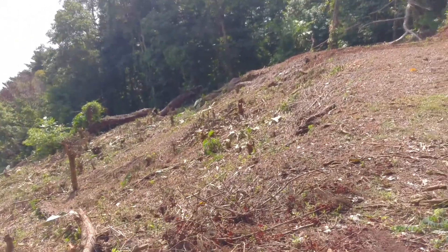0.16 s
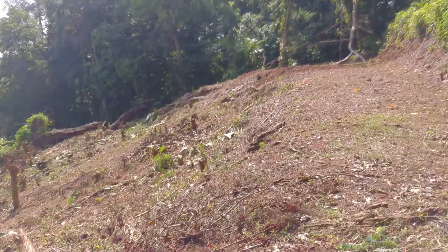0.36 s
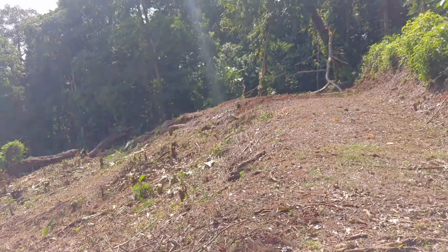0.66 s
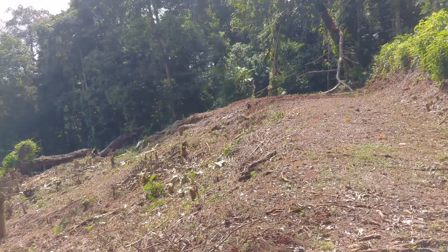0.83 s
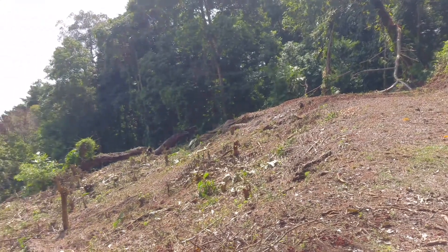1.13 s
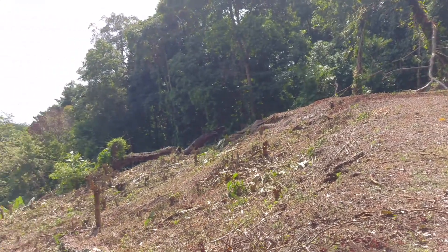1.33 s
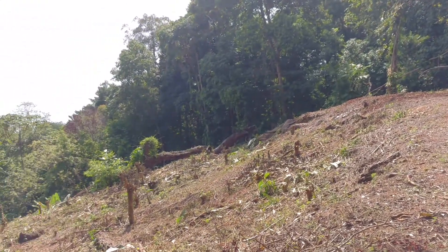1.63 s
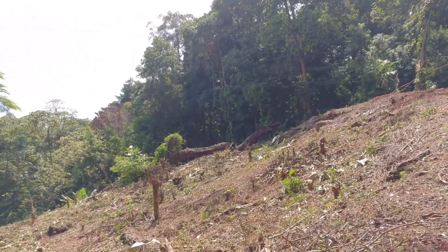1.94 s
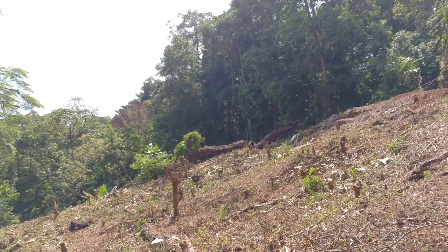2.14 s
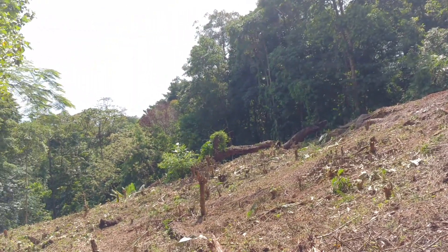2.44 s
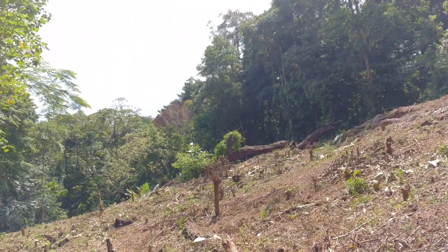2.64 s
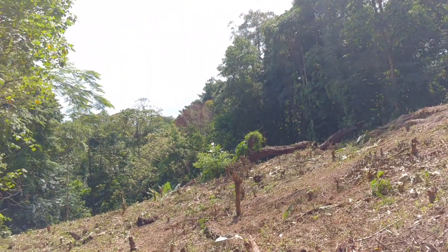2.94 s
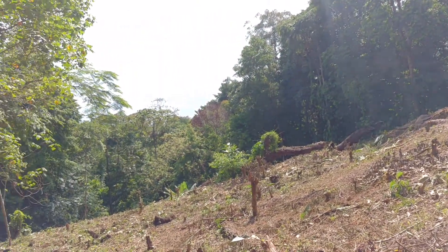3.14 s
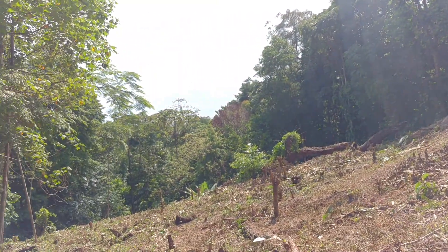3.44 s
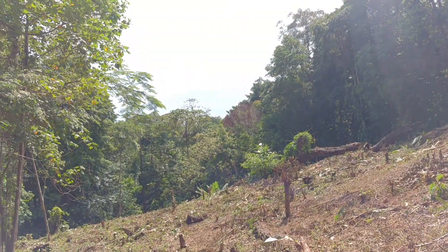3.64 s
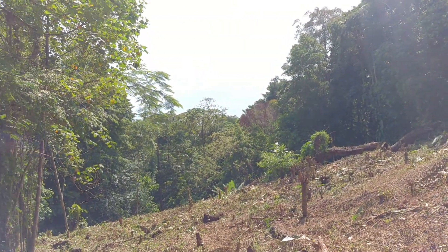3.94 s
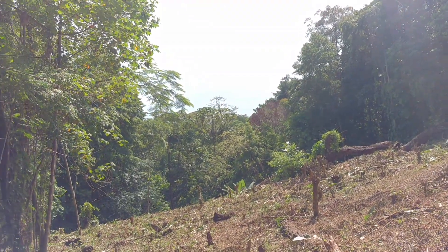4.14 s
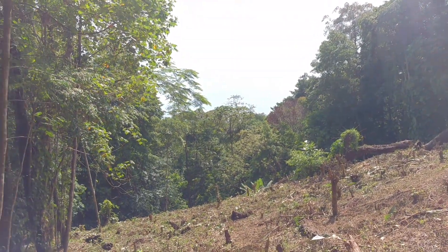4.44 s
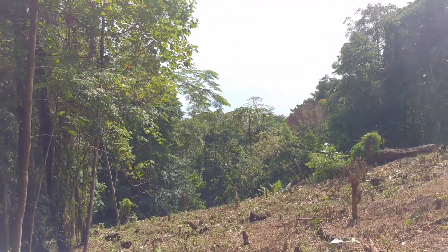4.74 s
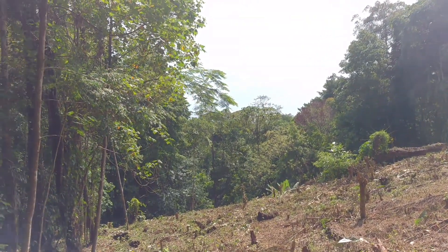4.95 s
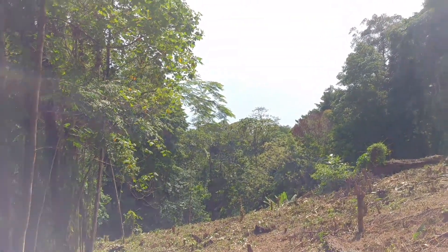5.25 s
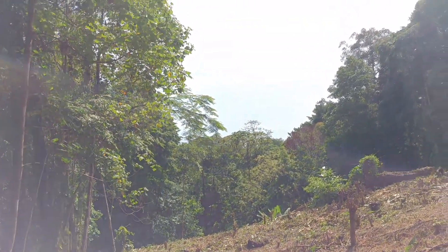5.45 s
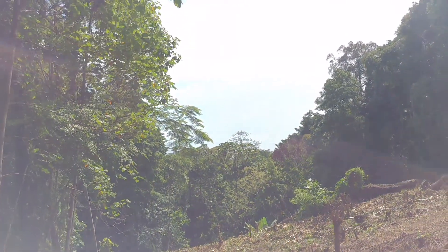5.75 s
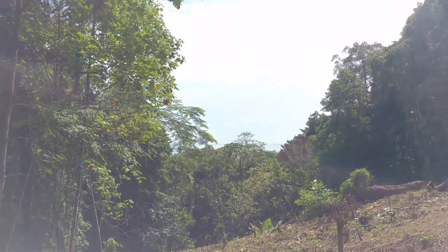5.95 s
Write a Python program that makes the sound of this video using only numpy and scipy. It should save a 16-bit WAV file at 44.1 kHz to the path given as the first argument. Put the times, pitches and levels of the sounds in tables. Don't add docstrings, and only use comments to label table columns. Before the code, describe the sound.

Two layers of cicadas hold an almost continuous shrill shimmer, fullest in the middle and softer toward the end. Distant birds give short buzzing chirps, rising whistles and a faint hoarse coo, with a light forest echo. Broad airy hiss and slight air rumble fill the background. Close to the handheld phone, fingertip taps and ticks occur, followed late by crackly dry-leaf strokes.

```python
import sys
import numpy as np
from scipy import signal
from scipy.fft import rfft, irfft, next_fast_len
from scipy.io import wavfile
from scipy.ndimage import uniform_filter1d

SR = 44100
rng = np.random.default_rng(int(sys.argv[2]) if len(sys.argv) > 2 else 0)


def materialize(psi):
    bounded = np.clip(np.atleast_2d(psi).T, -1, 1)
    quanta = np.round(bounded * 32767).astype(np.int16)
    wavfile.write(sys.argv[1], SR, quanta)


def convert_level_to_amplitude(level_db):
    exponent = np.asarray(level_db, float) / 20
    return 10 ** exponent


N = 268436

SIZE = next_fast_len(N)
HZ = np.arange(SIZE // 2 + 1) * SR / SIZE + 1e-3
TIME = np.arange(N) / SR
PORT_GAP_S = 0.0003813


def shape(points, count=1):
    points = np.array(points)
    return np.interp(np.log(HZ), np.log(points[:, 0]), points[:, count])


def back(spectrum):
    return irfft(spectrum, SIZE)[..., :N]


def lag(seconds):
    return np.exp(-2j * np.pi * HZ * seconds)


def sides(left_db):
    return convert_level_to_amplitude(np.array([[left_db], [-left_db]]) / 2)


def unit(x):
    return x / np.sqrt(np.mean(x ** 2))


def noise(channels):
    return rfft(rng.standard_normal((channels, SIZE))) * np.sqrt(SR / 2)


def walk(rate):
    k = int(SR / rate)
    steps = np.repeat(rng.standard_normal(N // k + 1), k)
    smooth = uniform_filter1d(uniform_filter1d(steps, k), k)
    return unit(smooth[:N])


def cicadas(level_db, kind, count):
    low_hz, high_hz, width, rate, throb, throb_db, gain_db, left_db = kind
    out = 0
    for hz in np.linspace(low_hz, high_hz, count):
        pace, place, start = rng.uniform(-1, 1, size=3)
        chance = rng.standard_normal((4000, 2))
        at = np.cumsum((1 + .12 * chance[:, 0]) / (rate * (1 + .2 * pace)))
        swing = throb_db * np.sin(2 * np.pi * throb * (1 + 0.202 * pace) * at + np.pi * start)
        strength = convert_level_to_amplitude(swing + 3.0 * chance[:, 1])
        clicks = np.bincount((at * SR).astype(int), strength, SIZE)[:SIZE]
        body = 1 / (1 + 1j * (HZ / hz - hz / HZ) * hz / width) ** 2
        out = out + rfft(clicks) * body * np.array([1 + 0 * HZ, lag(place * PORT_GAP_S)])
    return unit(back(out)) * convert_level_to_amplitude(level_db + gain_db) * sides(left_db)


def chorus():
    # (t/s, high level/dB, low level/dB)
    swells = [
        (0, -48, -54),
        (.28, -45.5, -54.5),
        (.75, -45, -52.5),
        (1.75, -44.5, -52.5),
        (2.6, -44.5, -52.5),
        (3.5, -44.5, -53.5),
        (4.4, -46, -53),
        (5.2, -47, -52.5),
        (6.09, -49.5, -52.5),
    ]
    # (lowest body f/Hz, highest body f/Hz, width/Hz, clicks per s, throbs per s,
    # throb/dB, gain/dB, left minus right/dB)
    high_kind = (8325, 10326, 550, 310, 12, 0.27, 4.43, 2.4)
    core_kind = (8887, 8981, 319, 280, 36, 3, -8.5, -7)
    low_kind = (6950, 7290, 400, 240, 11, 2.2, 2.56, 10)
    s, high_db, low_db = np.transpose(swells)
    drone = cicadas(np.interp(TIME, s, high_db), high_kind, count=16)
    drone += cicadas(np.interp(TIME, s, high_db), core_kind, count=4)
    drone += cicadas(np.interp(TIME, s, low_db), low_kind, count=7)
    return drone


def bird_notes():
    # (t/s, f/Hz, level/dB)
    buzzes = [(.303, 4060, -59), (.385, 5100, -49.5), (.51, 4900, -50), (.58, 3920, -58),
              (.72, 4870, -49.5), (1.371, 5130, -50.5), (1.70, 5160, -52), (1.953, 4770, -51),
              (2.37, 4940, -48), (2.47, 3810, -62), (3.031, 4960, -47.5), (3.388, 5050, -54),
              (3.475, 3950, -53), (3.6, 3840, -56.5), (3.875, 4830, -50), (4.296, 5270, -55),
              (4.663, 4870, -51), (4.802, 5030, -53), (5.281, 4850, -48), (5.889, 4770, -46.5),
              (5.96, 3800, -50.5)]
    # (t/s, length/s, from f/Hz, to f/Hz, level/dB)
    whistles = [
        (1.145, 0.015, 3500, 3540, -57),
        (2.176, 0.07, 3330, 4030, -54.5),
        (2.24, 0.044, 4300, 5300, -48),
        (2.272, .027, 5800, 5900, -52),
        (2.426, 0.036, 4700, 3320, -49),
        (2.464, .03, 3400, 4400, -49),
        (2.485, .029, 4400, 3270, -51),
        (5.7, .046, 3700, 4140, -64),
    ]
    riser_db = (-66, -60, -61, -59, -61)
    # (t/s, length/s, level/dB)
    coos = [
        (0, 0.051, -52),
        (3.615, 0.39, -59),
        (5.664, 0.197, -57),
    ]
    waver_hz, near_db = 35, 4.5
    out = [(s, 0.0996, hz - 40, hz + 40, db, 260, 0) for s, hz, db in buzzes]
    out += [tuple(row) + (waver_hz, near_db) for row in whistles]
    for k, db in enumerate(riser_db):
        out.append((.94 + k * .282, .1, 2320, 2750, db, waver_hz, near_db))
    out += [(s, length, 1023, 1023 + 101.6, db, 99.6, 0) for s, length, db in coos]
    return out


def birds():
    canopy_lag, valley_lag = 3, 9
    t60_s, echo_db = 0.67, 3.5
    voice, direct, shake = np.zeros(N), np.zeros((2, N)), walk(260)
    for s, length, from_hz, to_hz, db, buzz_hz, near_db in bird_notes():
        i = np.arange(int(s * SR), min(int((s + length) * SR), N))
        u = (TIME[i] - s) / length
        pitch = from_hz + (to_hz - from_hz) * u + buzz_hz * shake[i]
        swell = np.abs(np.sin(np.pi * u)) ** 0.13
        note = convert_level_to_amplitude(db) * swell * np.sin(2 * np.pi * np.cumsum(pitch) / SR)
        voice[i] += note
        late = valley_lag if to_hz < 3000 else canopy_lag
        direct[0, i] += note * convert_level_to_amplitude(near_db)
        direct[1, np.minimum(i + late, N - 1)] += note * convert_level_to_amplitude(near_db)
    echo = rng.standard_normal((2, SR)) * np.exp(-np.log(1000) * TIME[:SR] / t60_s)
    echo *= convert_level_to_amplitude(echo_db) / np.sqrt(np.sum(echo ** 2) / 2)
    return direct + signal.fftconvolve(voice[None], echo, axes=1)[:, :N]


def knocks():
    # (t/s, peak level/dB, thump f/Hz, crack minus thump/dB)
    thumps = [(0.041, -34, 198, -16), (0.183, -49, 180, -14), (4.616, -34, 198, -20),
              (4.627, -31, 334, -15), (4.640, -33, 260, 4.5), (4.653, -31, 180, -12), (4.658, -34, 300, -6),
              (4.8641, -25, 126, 0.5), (4.882, -26.5, 253, -11), (4.894, -24, 306, 5.5),
              (5.021, -36, 1100, -15), (5.2013, -25, 985, -1)]
    # (t/s, peak level/dB, left share -1..1)
    ticks = [(0.0935, -18, .47), (.357, -28, .4), (4.351, -35, .3), (4.894, -18.5, 0.6), (5.2017, -34, -.5),
             (5.3633, -26, -.4), (5.409, -34, -.5), (5.8235, -21, -.4), (5.833, -26, -.4),
             (5.8687, -29, -.4), (5.895, -27, -.4)]
    body_hz, body_db = 930, -44
    # (t/s, thump level/dB, thump f/Hz, crack minus thump/dB, crack top f/Hz, left share)
    hits = [(s, db, hz, crack_db, 1410, 1) for s, db, hz, crack_db in thumps]
    hits += [(s, db + body_db, body_hz, -body_db, 14600, share) for s, db, share in ticks]
    out, t = np.zeros((2, N + 4096)), TIME[:4096]
    grit = rng.standard_normal((len(hits), 4096))
    for (s, db, hz, crack_db, top_hz, share), rough in zip(hits, grit):
        thump = 2.16 * np.sin(2 * np.pi * hz * t) * np.exp(-t * hz * 2.36)
        push = -(np.exp(-t / 0.00011) + top_hz / 3500 * rough * np.exp(-t / 0.00029))
        soften = signal.butter(2, min(top_hz, .45 * SR), fs=SR, output="sos")
        crack = signal.sosfilt(soften, push)
        hit = convert_level_to_amplitude(db) * (thump + convert_level_to_amplitude(crack_db) * crack / np.abs(crack).max())
        i = int(s * SR)
        out[:, i:i + len(t)] += hit * np.array([[1 + share], [1 - share]])
    return out[:, :N]


def leaf_strokes():
    # (t/s at the loudest, level/dB, swell/s, fade/s)
    brushes = [
        (5.05, -73, .08, .08),
        (5.2, -59, 0.033, 0.087),
        (5.254, -53.5, 0.065, 0.042),
        (5.41, -56, 0.057, 0.055),
        (5.6, -64.5, 0.094, 0.32),
        (5.826, -56.5, 0.14, 0.068),
        (5.87, -55.5, 0.044, 0.11),
        (5.975, -58, 0.027, 0.089),
    ]
    power = 0
    for s, db, swell, fade in brushes:
        away = np.where(TIME < s, (s - TIME) / swell, (TIME - s) / fade)
        power = power + convert_level_to_amplitude(db - 12.5 * away) ** 2
    return np.sqrt(power)


def rustle():
    # (f/Hz, level/dB)
    colour = [(500, -7), (1200, 20.5), (2500, 14), (4000, 17.5), (6000, 11.5), (9000, 13), (13000, 9.5),
              (15500, 13.5)]
    sizes = convert_level_to_amplitude(2.2 * np.minimum(rng.exponential(size=(2, SIZE)), 3))
    struck = rng.random((2, SIZE)) < 1600 / SR
    grains = struck * rng.uniform(-1, 1, size=(2, SIZE)) * sizes
    scrape = 0.95 * rng.standard_normal((2, SIZE))
    crackle = rfft(unit(grains) + scrape) / (1 + 1j * HZ / 11500.0)
    strength = leaf_strokes() * convert_level_to_amplitude(16.0)
    return unit(back(crackle * convert_level_to_amplitude(shape(colour)))) * strength * sides(-1.5)


def forest():
    # (f/Hz, level/dB per Hz, left minus right/dB)
    hiss = [(61, -87, -5), (180, -71.5, 7), (329, -75, 2), (690, -80.5, 7.5), (1120, -82, 0),
            (1510, -83.5, 2), (1966, -84.5, 9), (2180, -92, -25.5), (3650, -92.5, -10.5),
            (4970, -88.5, 10.5), (6000, -96, 4), (8130, -86.5, 13.5), (11150, -99, 25), (13900, -140, -6)]
    # (centre f/Hz, quick/dB, slow/dB, extra/dB before the phone turns away)
    regions = [(1100, -0.8, -1.16, -0.5), (1970, 0.8, 3, 1), (3500, 0.7, -0.8, -2), (6000, -2.3, -1.7, .1),
               (13200, -2, -0.2, -0.5)]
    path_s, spread_hz, turn_s, turn_takes_s = 2.6e-4, 2240, 1.1, .3
    shared, left, right = noise(channels=3) * convert_level_to_amplitude(shape(hiss))
    alike = 0.97 * np.cos(2 * np.pi * HZ * path_s) / (1 + (HZ / spread_hz) ** 2)
    alike = np.clip(alike, -1, 1)
    own = np.sqrt(1 - abs(alike))
    common = np.sqrt(abs(alike)) * shared
    right_common = np.sign(alike) * common * lag(0.000063)
    ports = np.array([own * left + common, own * right + right_common])
    ports *= convert_level_to_amplitude(-7.0 * np.log10(1.02 - np.maximum(alike, 0) / (1 + (HZ / 770.0) ** 4)))
    ports *= sides(shape(hiss, count=2))[:, 0]
    centres = np.log([500.] + [row[0] for row in regions])
    parts = [back(ports * np.interp(np.log(HZ), centres, one)) for one in np.eye(len(centres))]
    gust_db = 0.91 * walk(20)
    facing = 1 / (1 + np.exp(4 * (TIME - turn_s) / turn_takes_s))
    out = parts[0]
    for part, (hz, quick_db, slow_db, extra_db) in zip(parts[1:], regions):
        stir_db = gust_db + quick_db * walk(14) + slow_db * walk(0.98) + extra_db * facing
        out = out + part * convert_level_to_amplitude(stir_db)
    return out


def breeze():
    # (f/Hz, level/dB per Hz)
    rumble = [(20, -110), (44, -100), (57, -69), (70, -77.5), (90, -73), (160, -99), (300, -100),
              (700, -99.5)]
    return back(noise(channels=2) * convert_level_to_amplitude(shape(rumble))) * convert_level_to_amplitude(0.53 * walk(3.7)) * sides(0.96)


def hums():
    # (f/Hz, width/Hz, level/dB, left minus right/dB, level change/dB per s)
    tones = [(59, 2.7, -58.5, 2, 0.5), (90, 3.4, -57.5, 4, 1), (184.4, 5.6, -50.5, 5.5, 0),
             (694.5, 4, -61.5, 9.5, -1), (764, 2.4, -69.5, 8, -.5), (1275, 3.5, -72.5, -16, 0.1),
             (1774, 5.5, -73, -6, -0.6)]
    out = 0
    for hz, width, db, left_db, fade_db in tones:
        tone = unit(back(noise(channels=1) / (1 + ((HZ - hz) / width) ** 2)))
        out = out + tone * convert_level_to_amplitude(db + fade_db * TIME) * sides(left_db)
    return out


def scene():
    return chorus() + birds() + knocks() + rustle() + forest() + breeze() + hums()


def top_cut(x):
    return signal.sosfilt(signal.butter(12, 15820, fs=SR, output="sos"), x)


def record(dry):
    # (f/Hz, share 0-1)
    cross = [(60, .8), (250, .72), (650, .68), (1200, .9), (2500, .89), (3800, .9), (5200, .85),
             (6400, .87), (7700, .62), (10300, .58), (11700, .76), (13000, .84)]
    ports = rfft(dry, SIZE) / (1 + (29.0 / HZ) ** 4) / (1 + (HZ / 15300) ** 24)
    share = np.clip(shape(cross), 0, 1)
    twist = np.exp(-1j * .45 / (HZ / 900. + 900. / HZ))
    far = share * lag(0.0003876) * twist
    wide = back((ports - far * ports[::-1]) / np.sqrt(1 + share ** 2))
    return top_cut(wide)


dry = scene()
out = record(dry)
materialize(out)
```